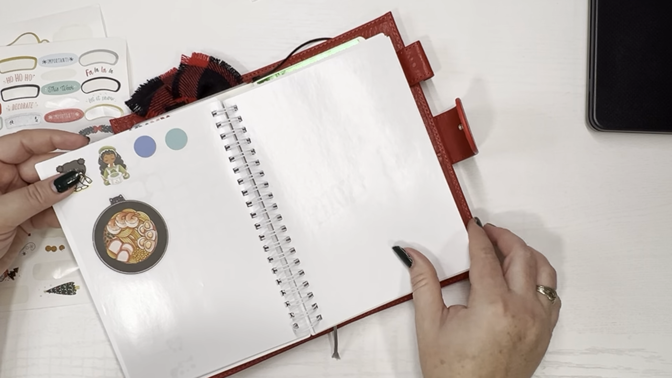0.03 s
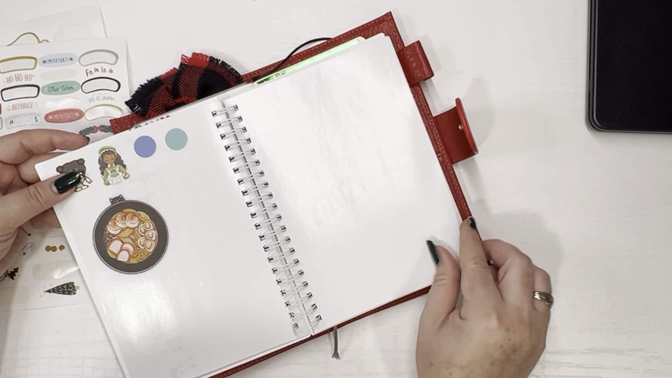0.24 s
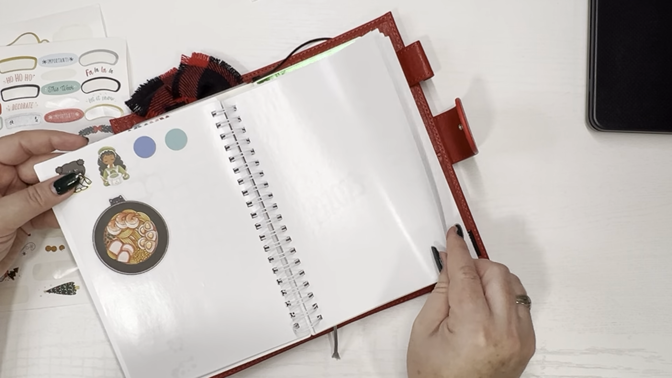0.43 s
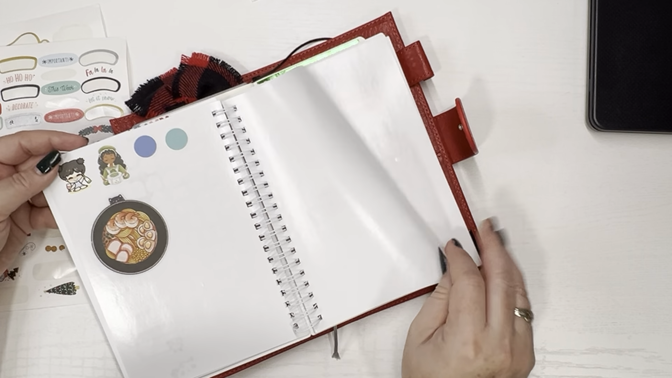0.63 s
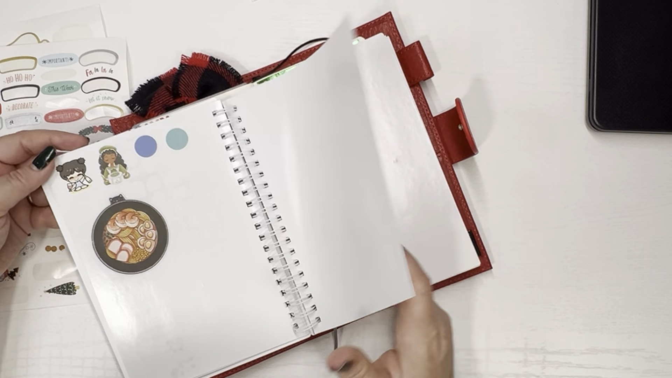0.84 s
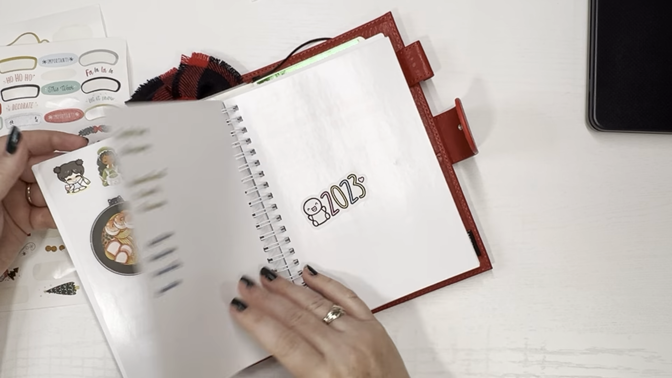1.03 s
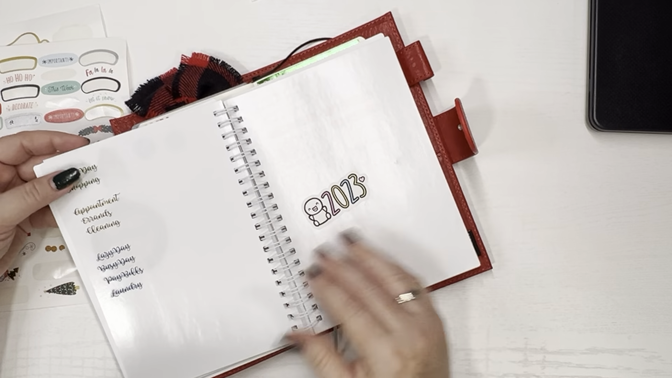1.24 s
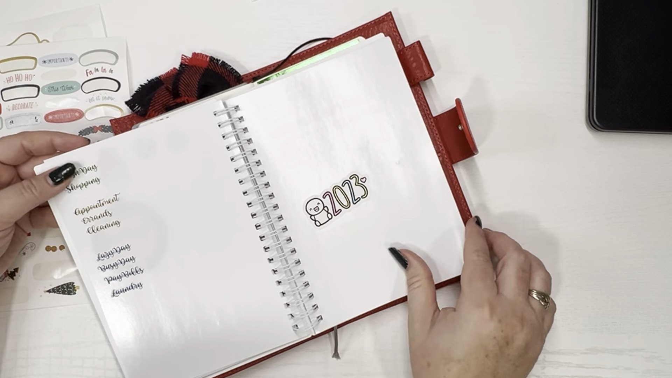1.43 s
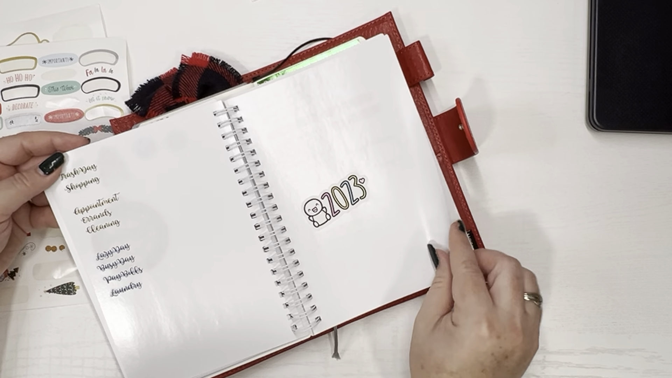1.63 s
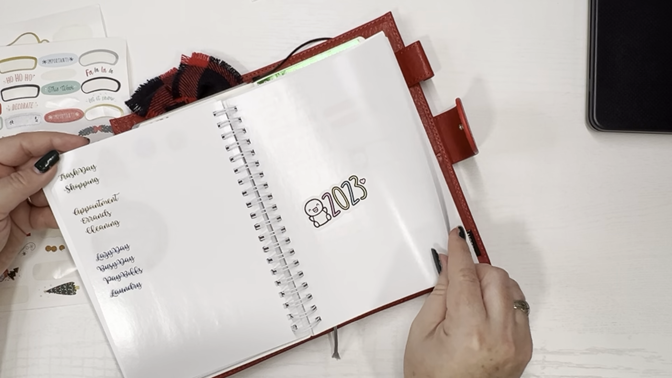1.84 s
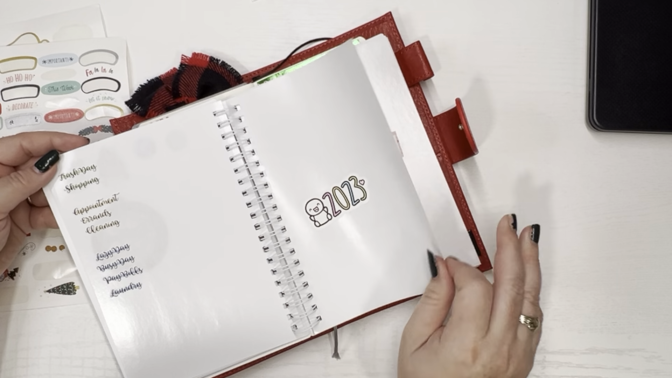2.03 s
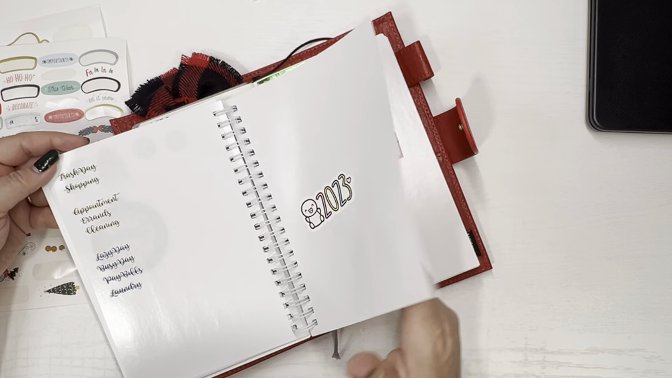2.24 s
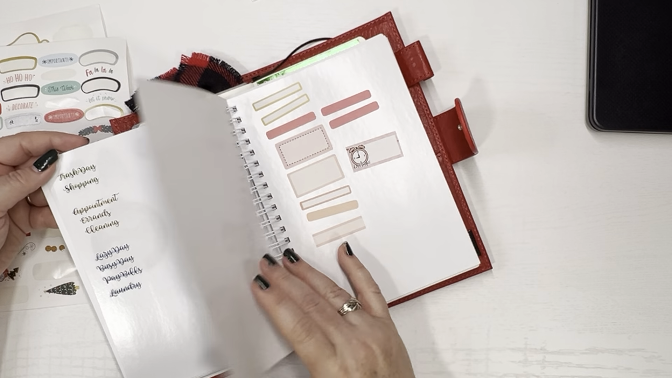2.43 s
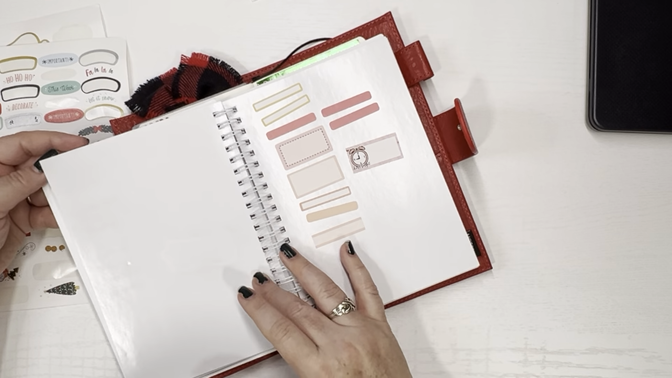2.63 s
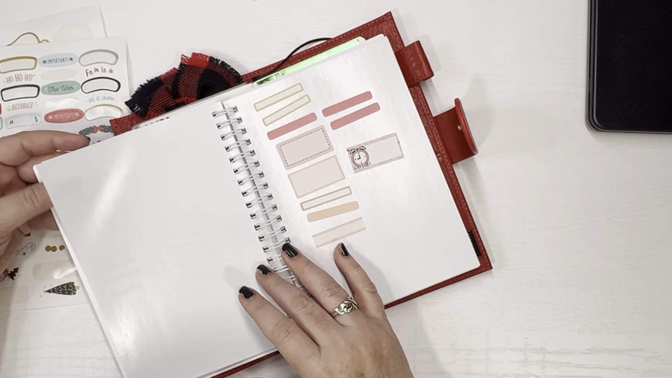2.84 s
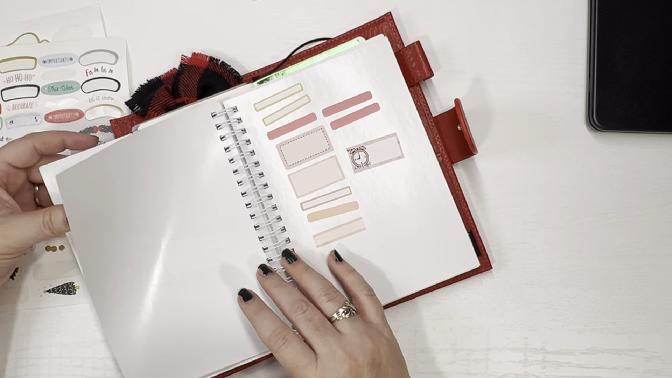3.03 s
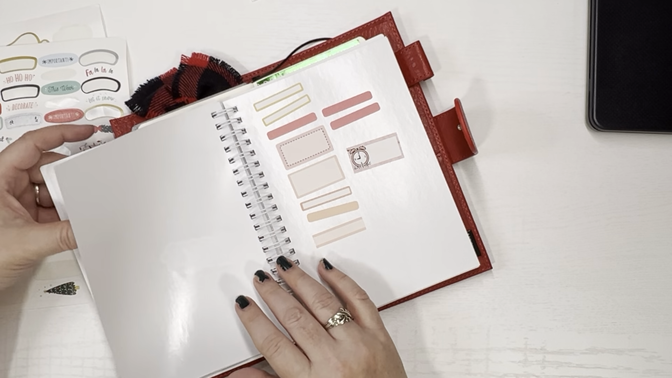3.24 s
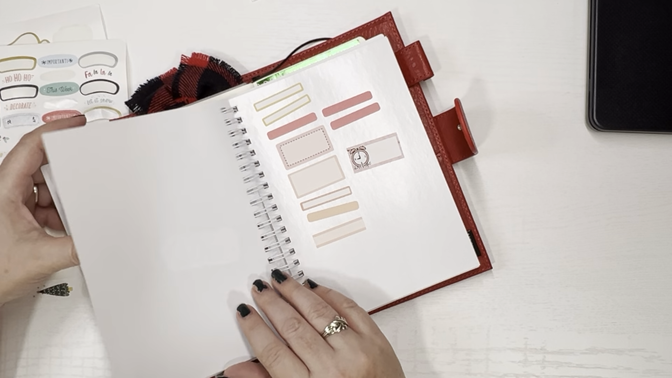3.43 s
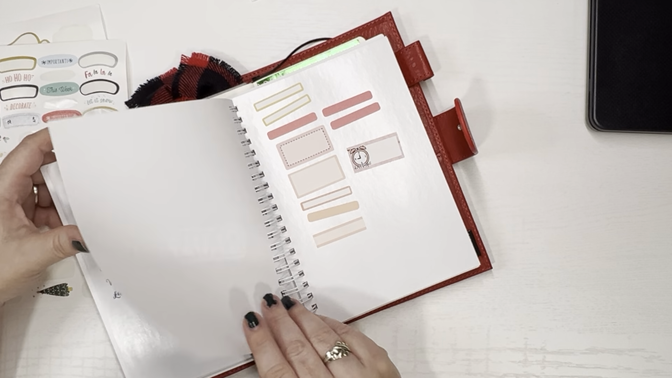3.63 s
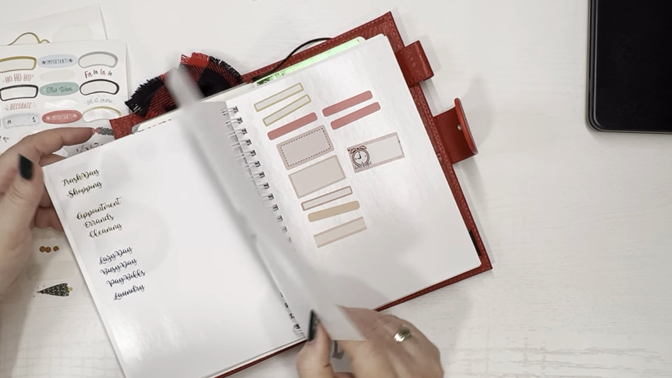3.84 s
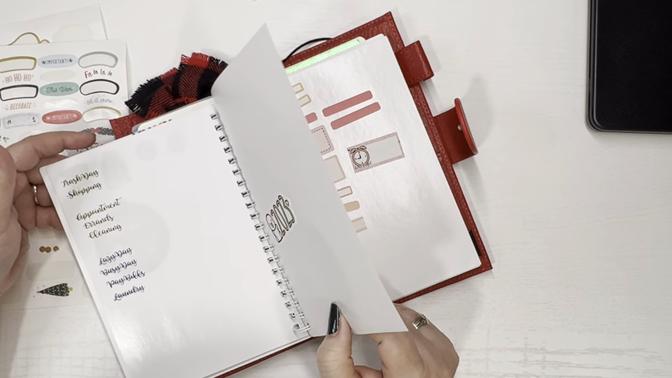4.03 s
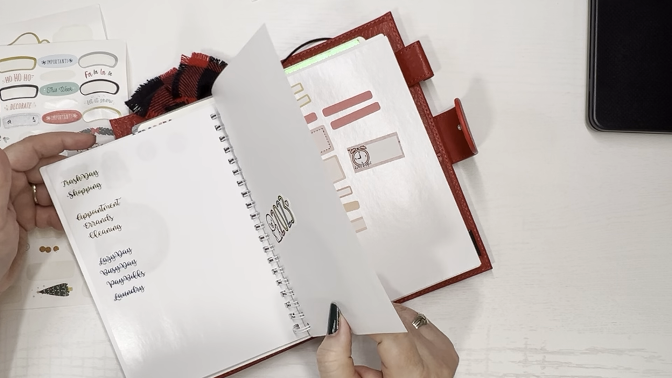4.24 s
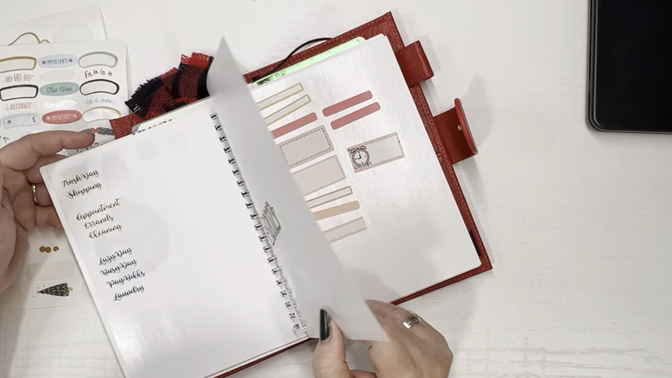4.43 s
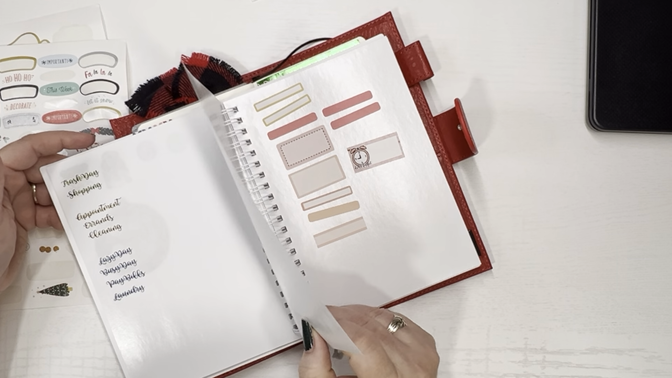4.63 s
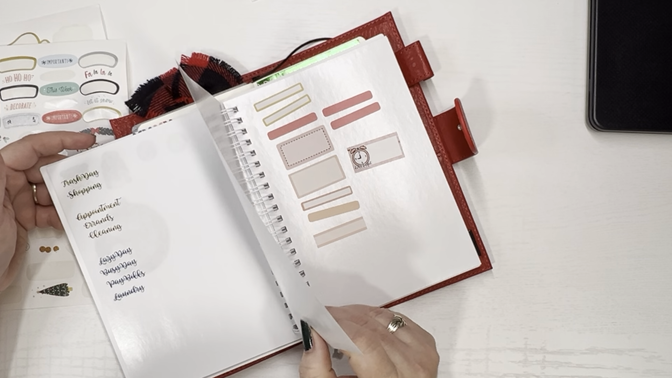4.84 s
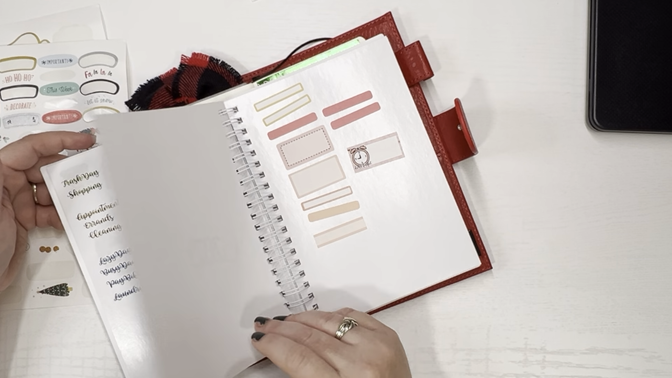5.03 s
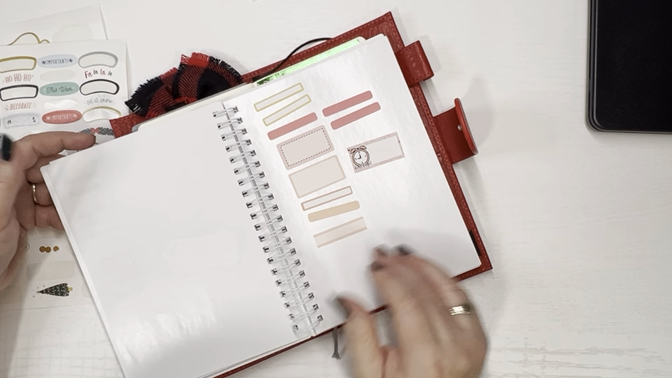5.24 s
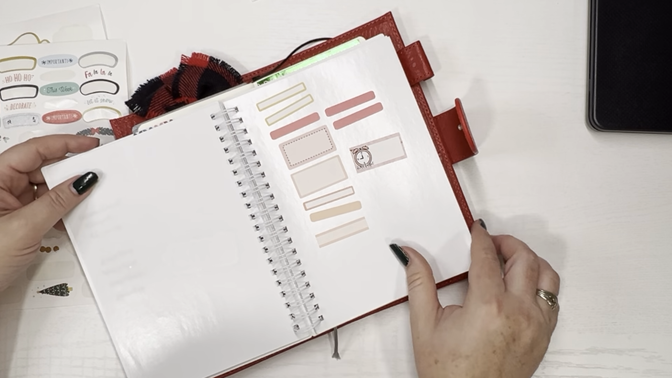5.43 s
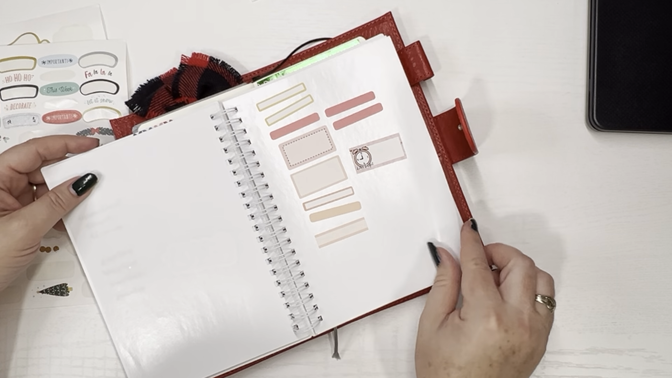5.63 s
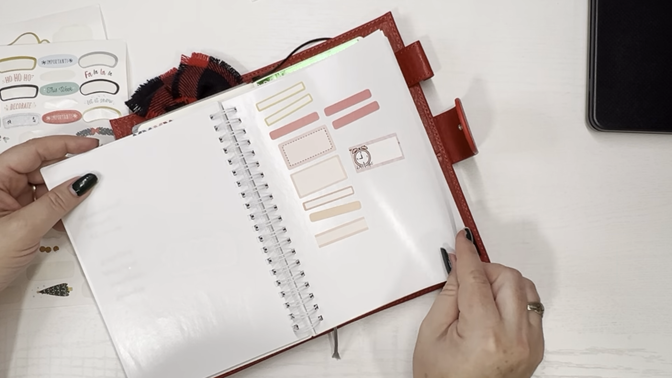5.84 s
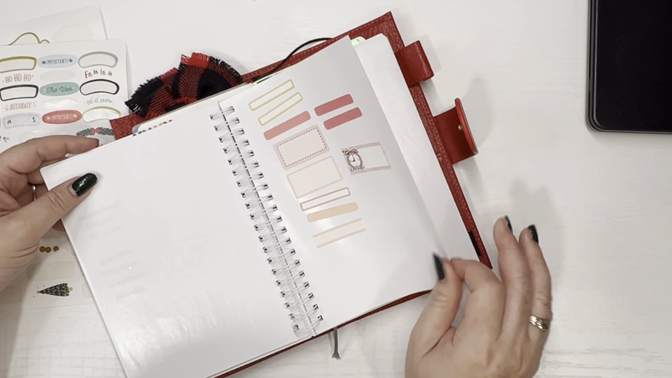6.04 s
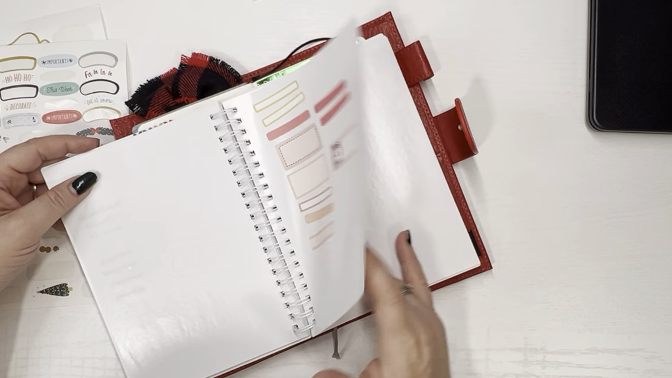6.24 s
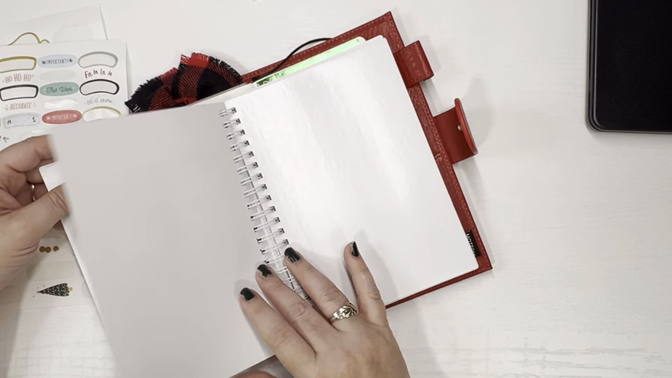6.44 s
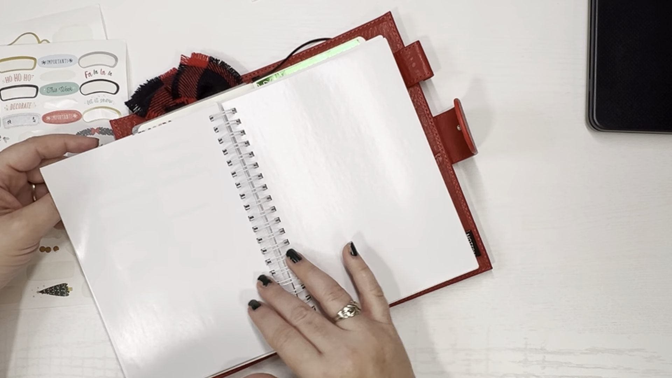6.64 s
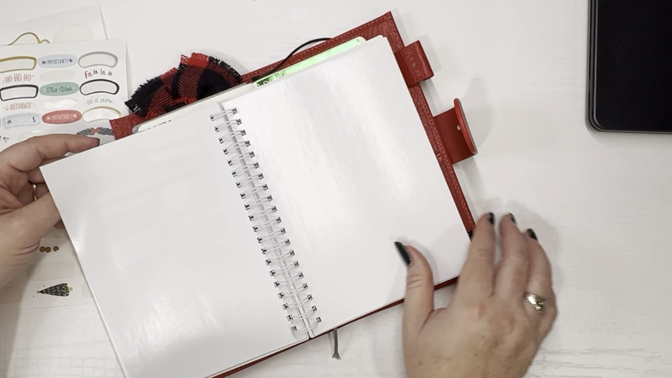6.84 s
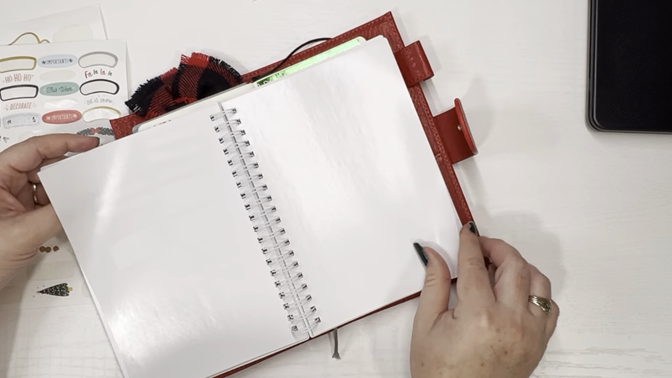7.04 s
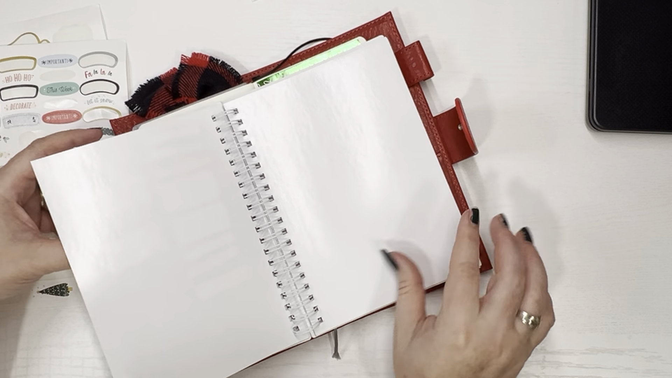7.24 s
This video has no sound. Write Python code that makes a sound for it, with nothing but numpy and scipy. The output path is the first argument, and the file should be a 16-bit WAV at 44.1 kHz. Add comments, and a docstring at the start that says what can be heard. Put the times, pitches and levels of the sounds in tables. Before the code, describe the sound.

Hands turn the slick pages of a spiral-bound sticker book on a desk, close to a stereo microphone in a quiet room. Fingertips hiss across paper, the sheet bows with a soft flutter, then swishes over the coil with sharp snaps and light nail ticks. A strong flip comes early, another follows, then back-and-forth handling, a quieter gap, and final turns. A low hum slowly pulses beneath.

```python
"""Glossy pages of a wire-bound sticker book turn on a desk, close to two microphone ports in a quiet room.
Sheets slide, bow and scrape along the coil: tiny slips over a smooth rush of noise, shaped stroke by stroke.
Buckling snaps, nail ticks and finger thuds are short pulses with dying rattles; the cover rubs dully.
Underneath, two low motor tones beat slowly against each other amid rumble and faint room air."""
import sys
import numpy as np
from scipy import signal
from scipy.fft import rfft, irfft, next_fast_len
from scipy.io import wavfile
from scipy.ndimage import uniform_filter1d, map_coordinates

SR = 44100
rng = np.random.default_rng(int(sys.argv[2]) if len(sys.argv) > 2 else 0)


def to_wav(sig):
    """Store sig (one row per channel, or 1-D mono) as 16-bit WAV at the path in sys.argv[1].

    Samples outside -1..1 are clipped; the rate is SR.
    """
    pcm = np.clip(np.atleast_2d(sig), -1, 1) * 32767
    pcm = np.round(pcm).astype(np.int16)
    wavfile.write(sys.argv[1], SR, pcm.T)  # frames by channels


N = 321930

# a sheet bows and flutters: peak t/s, rise/s, fall/s, bend level/dB before the trims in pages()
FLEXES = [(.466, 0.015, 0.051, -59.5), (.625, 0.033, .1, -62.5), (.752, 0.036, 0.055, -50.5),
          (0.895, 0.11, 0.057, -58.5), (.985, .025, 0.14, -50), (1.135, 0.11, 0.077, -56),
          (2.062, 0.012, 0.12, -56), (2.258, .08, 0.16, -51), (2.36, 0.033, 0.21, -56),
          (2.6, 0.056, 0.08, -63.5), (3.362, 0.032, 0.091, -55.5), (3.46, .06, 0.2, -53),
          (3.583, 0.013, 0.087, -63), (3.685, 0.1, 0.14, -53.5), (3.86, 0.1, 0.16, -58),
          (4.946, 0.033, 0.14, -67), (5.024, 0.035, .065, -50), (5.1, 0.046, 0.15, -68.5),
          (5.4, 0.07, 0.045, -68), (5.815, 0.027, 0.048, -68), (6.1, 0.052, 0.164, -57),
          (6.235, 0.13, 0.091, -53.5), (6.32, 0.072, 0.075, -48), (6.53, 0.16, .09, -54),
          (6.869, 0.022, 0.04, -62), (7.12, 0.044, 0.073, -53), (7.24, 0.1, 0.06, -58.5)]
# likeness of the two ports for sound from all sides: f/Hz, likeness (-1 to 1)
DIFFUSE = [(50, .85), (110, 1), (200, 0.28), (350, -0.018), (850, -1.3), (1500, 0.27), (3000, 0.21),
           (5000, 0.14), (6300, 1), (11000, -.3)]


def amp(db):
    """Decibels to gain."""
    return np.exp(np.asarray(db) * np.log(10) / 20)


def unit(x):
    """Scale to rms 1."""
    return x / np.sqrt(np.mean(x ** 2) + 1e-20)


def along(points, hz):
    """Read (f/Hz, value) points on a logarithmic frequency axis."""
    f, v = np.transpose(points)
    return np.interp(np.log(hz + 1), np.log(f + 1), v)


def wobble(rate):
    """A smooth random curve through rate knots a second."""
    knots = rng.standard_normal(int(N * rate / SR) + 4)
    return map_coordinates(knots, [np.arange(N) * rate / SR])


def filtered(x, response):
    """Multiply the spectrum of x by a response of frequency, which may be complex."""
    m = next_fast_len(N + SR // 2)
    return irfft(rfft(x, m) * response(np.fft.rfftfreq(m, 1 / SR)), m)[..., :N]


def causal(db):
    """The minimum-phase response that has these gains: its energy comes as early as it can."""
    cepstrum = irfft(np.log(amp(np.maximum(db, -120))))
    half = len(cepstrum) // 2
    cepstrum[1:half] *= 2
    cepstrum[half + 1:] = 0
    return np.exp(rfft(cepstrum))


def add(track, s, x):
    """Mix x into the track at s seconds."""
    part = track[round(s * SR):][:len(x)]
    part += x[:len(part)]


def ports(pair, likeness):
    """Mix two unrelated signals so that the microphone ports are alike by the given amount at each pitch."""
    def split(hz):
        alike = np.clip(along(likeness, hz), -1, 1)
        return np.sqrt(np.array([1 + alike, 1 - alike]) / 2)

    mid, side = filtered(pair, split)
    return np.array([mid + side, mid - side])


def friction(spectrum, slips, spread_db, smooth, patchy_db):
    """Tiny slips of uneven size (slips a second) over a smooth rush, in a colour that shifts in patches."""
    grains, draw = np.zeros(N), rng.standard_normal(N)
    slipping = rng.random(N) < slips / SR
    signs = np.sign(np.roll(draw, 1)[slipping])
    grains[slipping] = amp(spread_db * np.clip(draw[slipping], -2, 2)) * signs
    rush = smooth * draw[::-1]
    hz, t, z = signal.stft(unit(grains) + rush, SR, nperseg=1024)
    # random patches, smoothed over pitch and then over time
    field = uniform_filter1d(rng.standard_normal(z.shape), size=3, axis=0)
    field = uniform_filter1d(field, size=6, axis=1)
    colour_db = along(spectrum, hz)[:, None] + patchy_db * unit(field)
    return unit(signal.istft(z * amp(colour_db), nperseg=1024)[1][:N])


def blow(colour_db, t60, rattle, spread_s, size=8192):
    """A pulse and its dying rattle, peak 1; bending waves bring the treble first (1 kHz lags by spread_s)."""
    t, hz = np.arange(size) / SR, np.fft.rfftfreq(size, 1 / SR)
    push = rattle * rng.standard_normal(size) * amp(-60 * t / max(t60, .003))
    push[0] += 1
    dispersion = np.exp(-4j * np.pi * spread_s * np.sqrt(1000 * hz))
    x = irfft(rfft(push) * causal(colour_db(hz)) * dispersion)
    return x / np.abs(x).max()


def sheet_colour(hz, centre_hz, focus_db, ring_db=0):
    """Gains in dB of a snapping sheet: one bending mode stands out of a broad hump."""
    # paper when struck: f/Hz, level/dB
    paper_gains = [(150, -13), (400, -6), (800, 7.5), (1100, -6.5), (1700, 1), (3000, 1.5), (4000, -6.5),
                   (5800, -4), (9000, -7.5), (12200, -13), (13000, -8)]
    octaves = np.log2((hz + 1) / centre_hz)
    hump = -focus_db * np.log2(1 + 3 * octaves ** 2)
    mode = ring_db / (1 + (octaves / 0.19) ** 2)
    return along(paper_gains, hz) + hump + mode


def stroke(peak_s, rise_s, fall_s, db):
    """Power of one hand stroke over time: it swells to a peak and dies away by one law."""
    depth_db, rise_power, fall_power = 20, 1.54, 1.246  # drop over one rise or fall time; curvatures
    t = np.arange(N) / SR - peak_s
    rise = (-t[t < 0] / rise_s) ** rise_power
    fall = (t[t >= 0] / fall_s) ** fall_power
    drop_db = np.minimum(depth_db * np.concatenate([rise, fall]), 100)
    return amp(db - drop_db) ** 2


def air(level_db):
    """Faint room air: coloured noise that reaches the two ports as if from all sides."""
    # room air: f/Hz, level/dB per Hz, before scaling to the overall level
    air_spectrum = [(35, -18.5), (70, -12.5), (115, 7), (200, -9), (350, -10), (600, -14.5), (900, -15.5),
                    (1300, -23), (2200, -21), (3300, -28.5), (6000, -32.5), (12500, -39.5)]
    noise = filtered(rng.standard_normal((2, N)), lambda hz: amp(along(air_spectrum, hz)))
    return amp(level_db) * ports(unit(noise), DIFFUSE)


def hum():
    """Two motor tones drift apart by one cycle from lull to lull, with narrow bands of rumble around them."""
    # slow drift of the motor tones: t/s, level/dB
    drift = [(0, -8), (.5, -1), (1.05, 2.5), (2.8, -3), (4.1, 3), (4.9, -2.5), (6.35, 2.5), (7.05, -4),
             (7.3, 1)]
    # moments when the two motors cancel: t/s
    lulls = [-0.3, 0.22, 0.76, 1.37, 2.02, 2.62, 3.21, 3.80, 4.44, 4.93, 5.47, 6.13, 6.70, 7.20, 7.55]
    # narrow bands of rumble under the hum: f/Hz, width/Hz, level/dB
    rumble_bands = [(28.8, 1.6, -75), (52.5, 9.7, -61.5), (77, 22, -63.5), (102.4, 6, -66.5),
                    (115.5, 7, -64.5), (168, 22, -76)]
    middle_hz = 58.55  # midway between the two motors
    motor_db, second_over_first_db = -51, 0
    t = np.arange(N) / SR
    drift_db = np.interp(t, *np.transpose(drift))
    beats = np.interp(t, lulls, np.arange(len(lulls)))
    first = unit(np.sin(2 * np.pi * (middle_hz * t + beats / 2)))
    second = unit(np.sin(2 * np.pi * (middle_hz * t - beats / 2)))
    out = amp(motor_db + drift_db) * (first - amp(second_over_first_db) * second)
    for centre_hz, width, db in rumble_bands:
        noise = rng.standard_normal(N)
        out += amp(db) * unit(filtered(noise, lambda hz: np.exp(-((hz - centre_hz) / width) ** 2)))
    return out


def room(x):
    """The walls' answer at each port, 5 ms late: decaying noise whose treble dies first."""
    # room decay: f/Hz, t60/s
    decay = [(200, 0.69), (2500, 0.17), (10000, 0.049)]
    hz, t, z = signal.stft(rng.standard_normal((2, SR // 2)), SR, nperseg=256)
    tail = signal.istft(z * amp(-60 * t / along(decay, hz)[:, None]), SR, nperseg=256)[1]
    tail /= np.linalg.norm(tail[0])
    late = np.pad(x, (SR // 200, 0))
    return signal.fftconvolve(late[None], tail, axes=1)[:, :N]


def cover(judder_db):
    """The book shifts a little on the desk: its cover rubs dully, in small judders."""
    # shifts of the book: peak t/s, rise/s, fall/s, level/dB before the judder
    shifts = [(.46, 0.037, 0.17, -66), (.66, .12, 0.15, -66.5), (2.1, 0.091, .06, -60.5),
              (2.58, 0.12, 0.4, -68), (3.05, 0.27, 0.15, -70.5), (3.28, 0.27, 0.16, -72),
              (3.66, 0.12, 0.53, -65), (4.48, 0.26, 0.43, -71), (5.19, 0.11, .1, -75.5),
              (6.06, 0.049, 0.14, -61), (7.25, 0.19, 0.18, -64)]
    # dull rub on the desk: f/Hz, level/dB per Hz (relative)
    desk_spectrum = [(120, -22.5), (200, -5.5), (300, -1), (430, 0), (600, -19.5), (1000, -26.5),
                     (3000, -49)]
    power = sum(stroke(*row) for row in shifts)
    rub = friction(desk_spectrum, 300, spread_db=6.5, smooth=.8, patchy_db=2.5)
    return np.sqrt(power) * amp(judder_db * wobble(40)) * rub


def handling(focus_db, snap_db, tick_db, ring_db):
    """Snaps ring the sheet around their own pitch; nails and page edges tick; fingers thud softly."""
    # a sheet buckles or is tapped: t/s, peak level/dB before snap_db, f/Hz, t60/s
    snaps = [(.462, -33.5, 2850, 0.022), (.617, -44, 882, 0.014), (.729, -37.5, 950, 0.032),
             (.744, -34.5, 1600, 0.078), (.861, -37, 1680, 0.036), (0.89, -32, 1700, 0.1),
             (.972, -31.5, 1170, 0.11), (.999, -33.5, 1910, 0.018), (1.058, -23, 2930, 0.027),
             (1.104, -25.5, 3000, .011), (1.109, -24.5, 2130, 0.038), (2.052, -45, 923, .016),
             (2.109, -31.5, 1585, 0.05), (2.206, -37.5, 1090, 0.017), (2.218, -35.5, 1740, .02),
             (2.267, -39, 732, .04), (2.292, -31.5, 2400, 0.0206), (2.349, -30, 2020, 0.024),
             (2.509, -24, 3020, .06), (2.546, -17.5, 2910, 0.021), (3.357, -34.5, 1770, 0.058),
             (3.434, -28, 1530, 0.01), (3.439, -27, 1480, 0.063), (3.455, -26.5, 1410, 0.01),
             (3.461, -28, 1510, 0.06), (3.471, -23.5, 1660, 0.059), (3.577, -34, 1277, 0.054),
             (3.682, -35.5, 1100, 0.067), (3.747, -36, 1930, .037), (5.002, -38, 2570, .04),
             (5.020, -38.5, 1720, 0.06), (5.096, -44.5, 614, 0.056), (6.089, -31.5, 1764, 0.0072),
             (6.164, -32, 1250, 0.017), (6.18, -37, 1660, 0.02), (6.198, -38, 1870, 0.026),
             (6.251, -32.5, 1940, 0.047), (6.493, -32, 3000, .03), (6.513, -28, 1990, 0.038),
             (6.867, -47, 1370, 0.038), (6.918, -45, 1890, .012), (7.075, -31.5, 3330, .015),
             (7.168, -40, 1800, 0.11)]
    # fingernails and page edges tick: t/s, peak level/dB before tick_db
    ticks = [(.8894, -51), (1.3268, -42), (1.3574, -40), (1.4474, -50.5), (1.6466, -42.5), (3.4332, -40.5),
             (3.4524, -33.5), (5.3697, -49), (5.785, -51), (6.205, -36)]
    # fingers press the book on the desk: t/s, peak level/dB
    presses = [(0.731, -44), (0.892, -44.5), (0.975, -47.5), (1.332, -54.5), (1.362, -54), (2.109, -54),
               (2.258, -45.5), (2.351, -50), (3.684, -53), (5.034, -59), (5.097, -66), (5.387, -61.5),
               (6.209, -44.5), (6.299, -49), (7.103, -51.5)]
    # nail tick: f/Hz, level/dB
    nail = [(1000, -17.5), (3000, -11.5), (6000, -6.5), (9000, -3), (12000, -5)]
    # finger thud: f/Hz, level/dB
    thud = [(50, -35.5), (150, -1.0), (230, -2.5), (380, -2.5), (700, -14), (2000, -21.5), (6000, -69.5)]
    out = np.zeros(N)
    for s, db, centre_hz, t60 in snaps:
        colour = lambda hz: sheet_colour(hz, centre_hz, focus_db, ring_db)
        add(out, s, amp(db + snap_db) * blow(colour, t60, rattle=0.12, spread_s=.0008))
    for s, db in ticks:
        tick = blow(lambda hz: along(nail, hz), t60=0.041, rattle=0.15, spread_s=.0002)
        add(out, s, amp(db + tick_db) * tick)
    for s, db in presses:
        add(out, s, amp(db) * blow(lambda hz: along(thud, hz), t60=0.17, rattle=0.2, spread_s=.001))
    return out


def crinkles(spread_db, spread_octaves):
    """Small snaps at random moments while a sheet bows, as strong as the bending is then."""
    tries_per_s, over_bend_db, middle_hz, t60 = 45, 11, 1620, 0.023
    out = np.zeros(N)
    bend = np.sqrt(sum(stroke(*row) for row in FLEXES))
    for when, size, pitch in rng.random((int(tries_per_s * N / SR), 3)):
        i = int(when * N)
        if bend[i] <= amp(-68):  # too little bending to snap
            continue
        centre_hz = middle_hz * 2 ** (spread_octaves * (2 * pitch - 1))
        colour = lambda hz: sheet_colour(hz, centre_hz, focus_db=6)
        snap = blow(colour, t60, rattle=0.17, spread_s=0.000793, size=2048)
        add(out, i / SR, bend[i] * amp(over_bend_db + spread_db * (2 * size - 1)) * snap)
    return out


def strokes():
    """Untrimmed levels in dB of bending, scraping, swishing and hissing: each kind of stroke has its blend."""
    # a fingertip or lifted corner slides on glossy paper:
    # peak t/s, rise/s, fall/s, hiss level/dB, swish over hiss/dB
    slides = [(.09, 0.067, 0.08, -75.5, -7), (.25, 0.14, 0.26, -66, -28), (0.441, 0.07, 0.17, -59.5, 1),
              (.63, 0.14, 0.073, -56.5, 1), (.73, 0.14, 0.05, -50, -10.5), (.86, 0.18, 0.48, -68, 3),
              (1.345, 0.017, 0.16, -68.5, -4), (1.58, 0.24, 0.17, -66.5, -16),
              (1.652, 0.032, 0.043, -60.5, -28), (1.86, 0.22, 0.38, -63.5, -1.5),
              (2.02, 0.11, 0.16, -51.5, -5.5), (2.104, 0.18, 0.11, -56, -2), (2.814, 0.026, .19, -66.5, -7),
              (5.672, 0.16, 0.11, -60.5, -15), (5.802, .04, 0.072, -56, -8), (5.93, 0.19, .15, -67, 1),
              (6.066, 0.088, 0.042, -48.5, -8), (7.0, 0.064, 0.093, -66, -1.5),
              (7.14, 0.13, 0.25, -61, 1.5), (7.237, 0.043, 0.019, -52, -13)]
    # a sheet sweeps round the coil and brushes its neighbour:
    # peak t/s, rise/s, fall/s, swish level/dB, scrape over swish/dB
    sweeps = [(.985, 0.046, 0.061, -47, -7.5), (1.075, 0.057, 0.079, -41, -11.5),
              (1.106, 0.09, 0.014, -45.5, 4), (2.36, 0.034, 0.026, -48.5, -8),
              (2.525, 0.054, 0.052, -38.5, -2.5), (2.59, .05, 0.12, -63.5, -5),
              (2.95, .11, 0.28, -70.5, 0.5), (3.21, 0.092, 0.14, -69.5, 4), (3.33, 0.16, 0.32, -66.5, 1),
              (3.47, 0.039, 0.072, -44, -8), (3.644, 0.058, 0.14, -51, -1), (3.748, 0.036, .05, -54, 5.5),
              (3.829, 0.064, 0.099, -51.5, -9.5), (3.962, 0.075, 0.042, -61, 2.5),
              (4.5, 0.05, .08, -75.5, -2), (5.024, 0.034, 0.026, -49, 3.5), (5.61, 0.032, 0.22, -76, 7.5),
              (6.322, 0.058, 0.031, -48, 0), (6.42, 0.069, 0.11, -55, -5), (6.512, 0.14, 0.085, -49, -3.5)]
    # the held book never quite rests: level/dB of bend, scrape, swish, hiss
    held = [-85, -85.5, -109.5, -99]
    power = np.outer(amp(held) ** 2, np.ones(N))
    # blends in dB over the stroke's own level: bend, scrape, swish, hiss
    blends = [(row, [-16, -13, swish, 0]) for *row, swish in slides]
    blends += [(row, [-8, scrape, 0, -8]) for *row, scrape in sweeps]
    blends += [(row, [0, -6, -9.5, -11]) for row in FLEXES]
    for row, blend_db in blends:
        power += np.outer(amp(blend_db) ** 2, stroke(*row))
    return 10 * np.log10(power)


def pages(slips, spread_db):
    """A turning sheet flutters as it bends, scrapes on the coil, swishes and hisses over the next one."""
    # colours of the four sounds: f/Hz, level/dB per Hz (relative)
    bend_spectrum = [(100, -17.5), (170, -6.5), (235, -2), (330, -11.5), (450, 2), (560, 0.5), (680, 0),
                     (820, -0.5), (1100, -3), (1500, -12.5), (2500, -29.5), (5000, -63.5)]
    scrape_spectrum = [(700, -36), (1150, -13), (1500, -4), (1850, -1), (2200, -5), (2600, -10),
                       (3500, -32), (6000, -48.5)]
    swish_spectrum = [(1500, -36.5), (2350, -6), (2700, -4), (3000, -1.5), (3300, -4.5), (3800, -5),
                      (4300, -10.5), (5000, -10), (8000, -26.5)]
    slide_spectrum = [(1500, -46), (2500, -12.5), (3100, -11.5), (4000, -19), (4900, -9.5), (5800, -1.5),
                      (8000, 0.5), (9500, -0.5), (11500, -3), (12500, -14)]
    # likeness of the two ports close to the sheet: f/Hz, likeness (-1 to 1)
    close_likeness = [(90, .97), (200, .8), (400, .75), (840, .62), (1300, .9), (1900, .97), (3500, .9),
                      (4800, .7), (6300, .98), (8500, .87), (11600, .87)]
    bend_db, scrape_db, swish_db, slide_db = strokes()
    catch = wobble(130)  # the edge catches and lets go

    def surface():
        """The sound of one part of the sheet."""
        bend = friction(bend_spectrum, 400, spread_db, smooth=0.77, patchy_db=3.5)
        scrape = friction(scrape_spectrum, slips, spread_db, smooth=.6, patchy_db=4.0)
        swish = friction(swish_spectrum, slips, spread_db, smooth=1.0, patchy_db=4.5)
        slide = friction(slide_spectrum, 2500, spread_db, smooth=1.7, patchy_db=3.5)
        out = amp(bend_db - 1.5 + 1.5 * catch) * bend
        out += amp(scrape_db - 0.5 + 2.1 * catch) * scrape
        out += amp(swish_db + 0.23 + 0.93 * catch) * swish
        out += amp(slide_db + 1.5 * catch) * slide
        return out

    # the sheet is wide and close, so each port hears its own mix of the parts
    return ports(np.array([surface(), surface()]), close_likeness)


def direct_sound(paper):
    """The book lies a little off the microphone's axis: the ports differ in phase and slightly in level."""
    # phase between the ports: f/Hz, lead of the left/rad
    lead = [(100, 0), (850, -0.3), (1400, 0), (4100, -0.4), (4800, -1.9), (5400, -5.7), (7300, -6.4),
            (11800, -8.8)]
    sides = np.array([[1], [-1]])
    shifted = filtered(paper, lambda hz: np.exp(.5j * along(lead, hz) * sides))
    return shifted * amp(.2 * sides)  # left 0.2 dB up, right 0.2 dB down


def scene():
    """The book heard directly and off the walls, over the motors and the room air."""
    paper = pages(slips=600, spread_db=2.5)
    paper = paper + handling(focus_db=3, snap_db=-1.5, tick_db=6.5, ring_db=8.5)
    paper = paper + crinkles(spread_db=3, spread_octaves=0.96) + cover(judder_db=-0.5)
    walls = amp(-15.0) * ports(room(paper.mean(axis=0)), DIFFUSE)
    return direct_sound(paper) + walls + hum() + air(level_db=-70)


def record(dry):
    """The recorder keeps nothing above its band limit."""
    return filtered(dry, lambda hz: hz < 12500)


dry = scene()
out = record(dry)
to_wav(out)
```